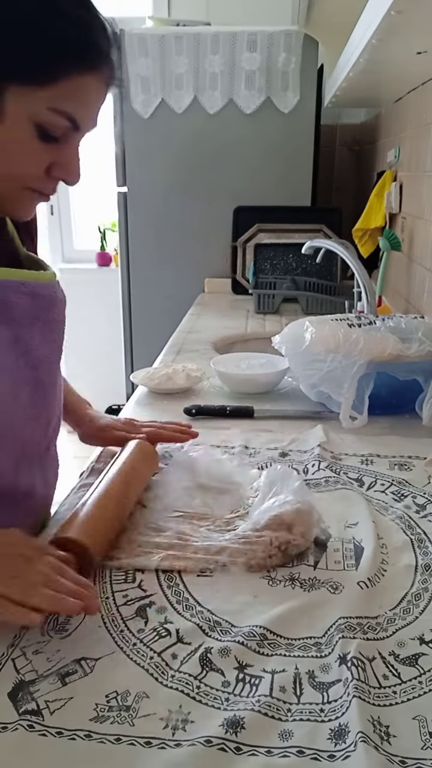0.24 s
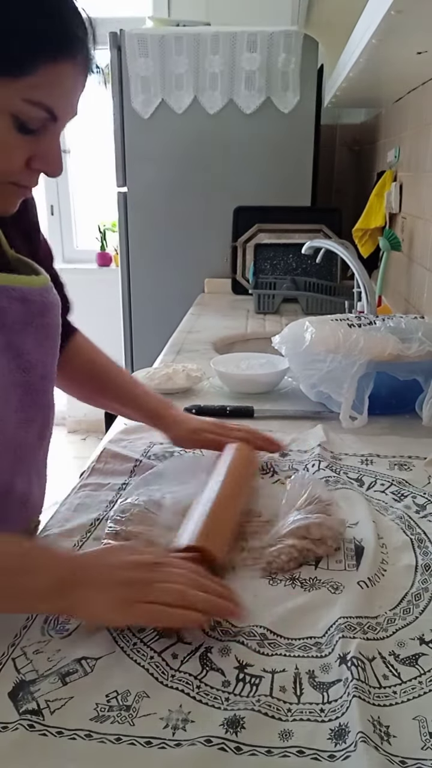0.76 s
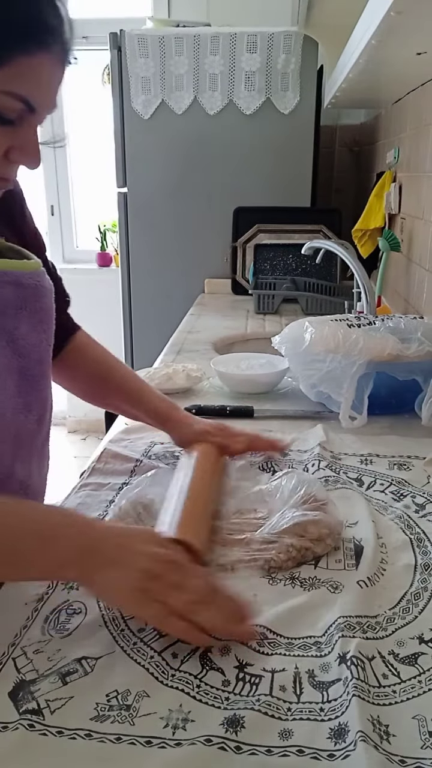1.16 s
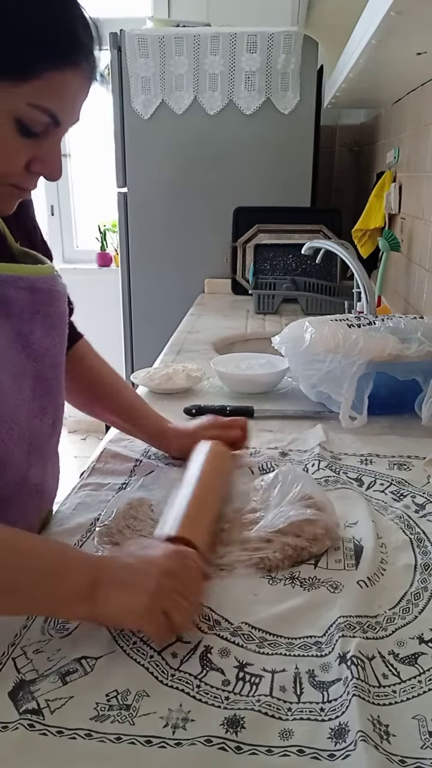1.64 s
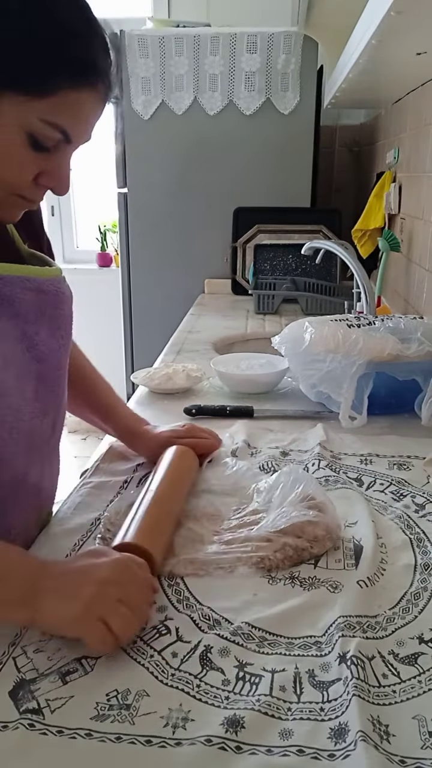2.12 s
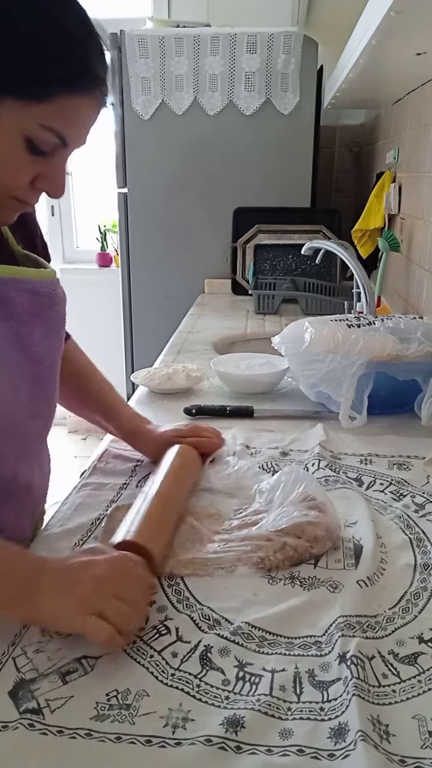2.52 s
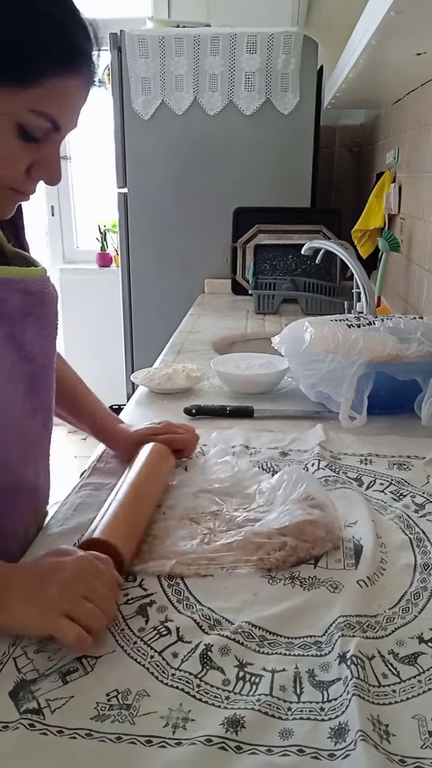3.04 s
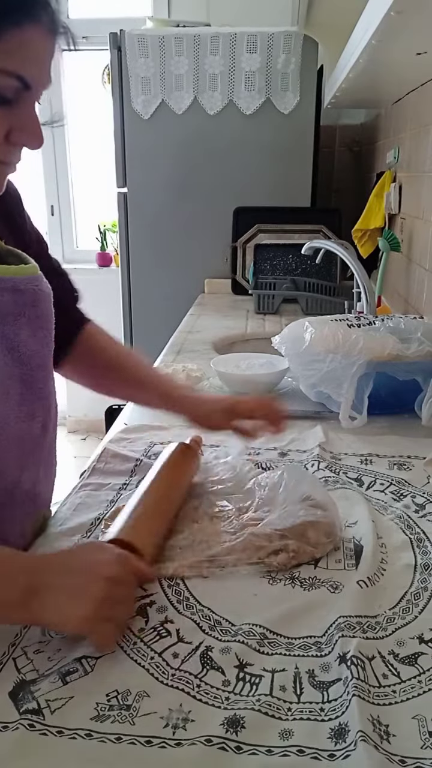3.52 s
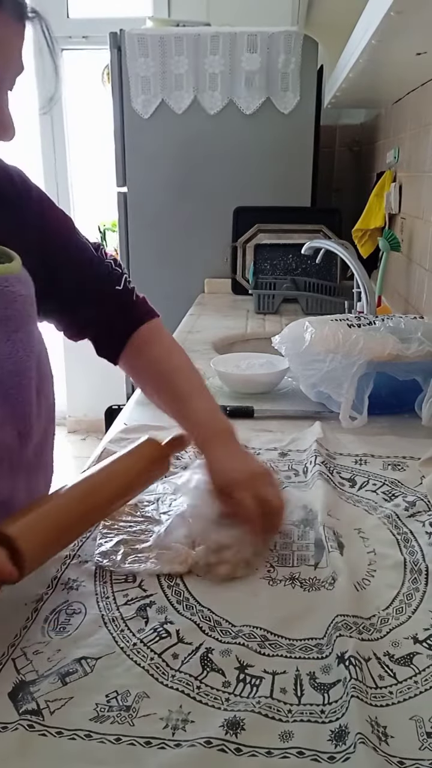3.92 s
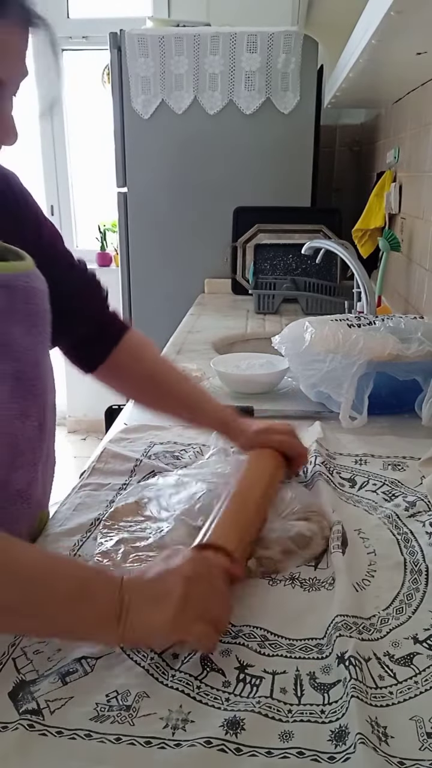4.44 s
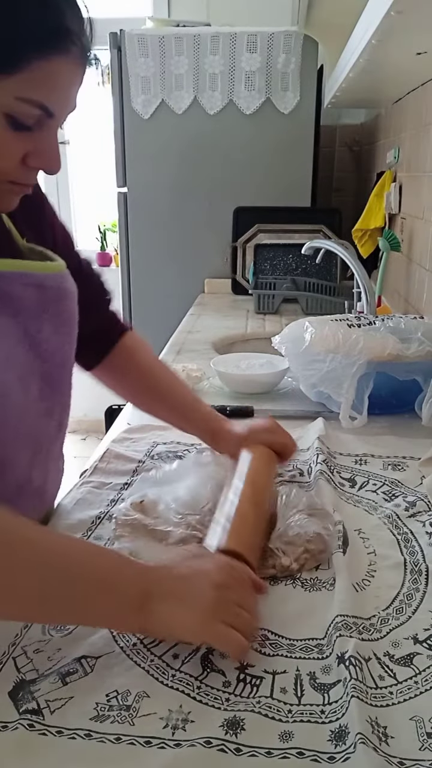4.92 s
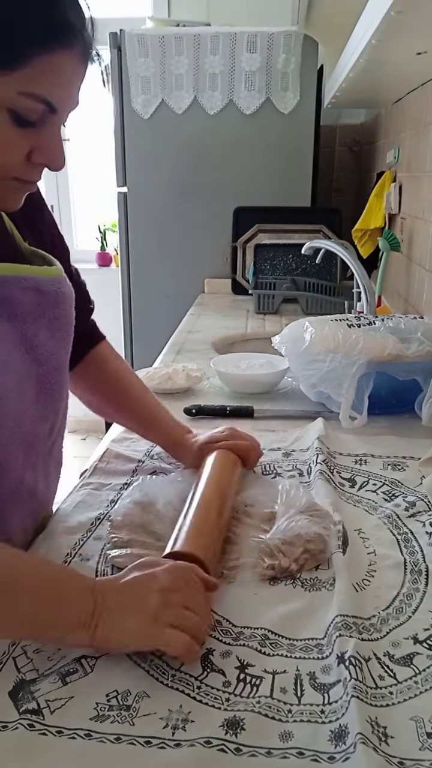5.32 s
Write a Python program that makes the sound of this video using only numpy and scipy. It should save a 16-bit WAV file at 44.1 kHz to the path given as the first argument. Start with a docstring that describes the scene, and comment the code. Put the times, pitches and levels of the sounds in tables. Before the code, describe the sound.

Close up in a small hard-walled kitchen, a wooden rolling pin crushes nuts in a crinkling plastic bag. Early strokes crackle, with one loud crack just before two seconds. Softer rolling follows with low counter rumble and tiny squeaks. The loose handle rattles as the pin lifts, a hand rustles the bag, then harder strokes bring a run of cracks and a strong wooden knock near the end. Small microphone, little deep bass.

```python
"""Crushing nuts with a rolling pin

Nuts in a plastic bag are crushed under a wooden pin on a cloth-covered counter in a hard-walled kitchen.
Cracks and light ticks are bursts of tiny clicks that ring the pin; knocks ring hollow wood and the counter.
The bag crinkles in random snaps, crumbs shake the counter, a loose handle rattles and the axle squeaks.
Filtered noise gives the echoes and the room's air; wavering sines make an appliance's hum."""
import sys
import numpy as np
from scipy import signal
from scipy.fft import rfft, irfft
from scipy.io import wavfile

SR = 44100
rng = np.random.default_rng(int(sys.argv[2]) if len(sys.argv) > 2 else 0)


def inscribe(sig):
    """Save sig as 16-bit PCM at rate SR to the path in sys.argv[1].

    A 1-D sig is mono; a 2-D sig holds one channel per row.
    Samples are clipped to [-1, 1] before scaling.
    """
    pcm = np.round(np.clip(np.atleast_2d(sig).T, -1, 1) * 32767)
    wavfile.write(sys.argv[1], SR, pcm.astype(np.int16))


def ratio_of_db(decibels):
    """Turn decibels (scalar or array-like) into linear amplitude factors; 0 dB maps to 1."""
    return 10 ** (np.asarray(decibels, float) / 20)


N = 245195   # length in samples
STILL_DB = -90   # level of the bag and the counter when nothing moves them


def rms_one(x):
    """Scales a sound to an rms of 1."""
    return x / np.sqrt(np.mean(x ** 2) + 1e-20)


def at_hz(points, hz):
    """Reads a curve of (f/Hz, value), with straight lines over log frequency."""
    points = np.array(points)
    return np.interp(np.log(hz + 1), np.log(points[:, 0]), points[:, 1])


def drift(rate_hz):
    """Slow chance: noise through two equal one-pole low-passes at rate_hz, rms 1."""
    r = np.exp(-80 * np.pi * rate_hz / SR)   # made at a fortieth of the sample rate
    noise = rng.standard_normal(N // 40 + 2002)
    slow = signal.lfilter([1], [1, -2 * r, r * r], noise)[2000:]
    return np.interp(np.arange(N) / 40, np.arange(len(slow)), rms_one(slow))


def colour(x, spectrum, size=8192):
    """A causal filter with this spectrum and unit energy, made by folding the cepstrum."""
    cepstrum = irfft(np.log(ratio_of_db(at_hz(spectrum, np.fft.rfftfreq(size, 1 / SR)))))
    cepstrum[1:size // 2] *= 2
    cepstrum[size // 2 + 1:] = 0
    shape = irfft(np.exp(rfft(cepstrum)))[:size // 2]
    return signal.fftconvolve(x, shape / np.sqrt(np.sum(shape ** 2)))[:len(x)]


def bandpass(x, low_hz, high_hz):
    """Keeps one band of frequencies."""
    return signal.sosfilt(signal.butter(2, [low_hz, high_hz], "band", fs=SR, output="sos"), x)


def ring(push, hz, t60):
    """A resonance: a unit click sets off a sine that falls by 60 dB in t60 seconds."""
    r, w = ratio_of_db(-60 / (t60 * SR)), 2 * np.pi * hz / SR
    return signal.lfilter([0, np.sin(w)], [1, -2 * r * np.cos(w), r * r], push + 1e-18)


def struck(push, modes, extra_db, neighbour=-1):
    """A push rings all the modes of a body, by default with neighbours in opposite phase; peak 1."""
    sound = 0
    for (hz, db, t60), more_db in zip(modes, extra_db):
        shifted_hz = hz * rng.normal(1, 0.002)   # grip and load shift each mode a little
        sound = ratio_of_db(db + more_db) * ring(push, shifted_hz, t60) + neighbour * sound
    return sound / np.max(np.abs(sound))


def near_mode(modes, ring_hz, boost_db):
    """The contact point favours the modes near ring_hz: extra dB for each mode."""
    octaves = np.log2(np.array(modes)[:, 0] / ring_hz)
    return boost_db * np.exp(-(octaves / 0.2) ** 2)


def grains(count, per_s, spread_db):
    """Random clicks of either sign, a few much larger than the rest."""
    sizes = ratio_of_db(spread_db * np.minimum(rng.exponential(1, count), 5)) * rng.choice([-1, 1], count)
    return sizes * (rng.random(count) < per_s / SR)


# Cracks of nuts, and a few light ticks, probably of the handle:
# t/s, peak of the snap level/dB, favoured ring f/Hz, peak of the pin's ring level/dB
CRACKS = [(0.102, -37.5, 1670, -33), (0.113, -39, 2430, -39), (0.3433, -57, 1870, -41),
          (0.433, -30.5, 1950, -30), (0.444, -27.5, 1780, -25), (0.453, -50, 2680, -34),
          (0.948, -26, 2700, -22), (0.958, -32.5, 1920, -32), (1.1977, -38, 2010, -33.5),
          (1.612, -58, 1900, -38.5), (1.8066, -58, 2600, -43.5), (1.9086, -15.5, 2220, -22),
          (1.914, -28, 1510, -27.5), (1.9102, -21.5, 2850, -15), (4.252, -42.5, 1480, -41.5),
          (4.2717, -40.5, 2780, -35.5), (4.408, -32.5, 1480, -38), (4.4191, -28.5, 2700, -22),
          (4.863, -22, 2800, -22), (5.002, -37, 1240, -35), (5.0092, -27.5, 2110, -16),
          (5.012, -46, 1230, -19.5), (5.1519, -31, 2800, -27.5), (5.277, -15.5, 1710, -12),
          (5.3987, -41, 2610, -31), (5.521, -39.5, 1210, -19), (5.52, -22, 2080, -15.5)]
# What pin and nuts ring with: f/Hz, relative level/dB, time to fall by 60 dB t/s
PIN_MODES = [(1244, -12, .035), (1460, -8, .035), (1680, -8, .035), (1870, -4, .018), (2060, -3, .016),
             (2190, -2, .016), (2420, -2, .013), (2680, 0, .01), (2950, -1, .009), (3300, -5, .009),
             (3800, -1, .008), (4350, -1, .009), (5700, -4, .01), (6350, -3, .01)]
# Colour of a snap: f/Hz, relative level/dB (per Hz)
SNAP_COLOUR = [(710, -27.5), (1200, -38), (1970, -20), (2190, -12), (3220, -21), (3870, -11), (4900, -22),
               (5870, -9.5), (11600, -82), (15600, -58)]


def cracks():
    """A crack or tick is a few ms of splinters, and the jolt rings the pin."""
    out, size = np.zeros(N + SR), SR // 2
    t, pin_hz = np.arange(size) / SR, np.array(PIN_MODES)[:, 0]
    swell = t / .005 * np.exp(1 - (t / 0.0063) ** 2)
    click = np.exp(-((t - .00012) / .00004) ** 2 / 2)
    for s, snap_db, ring_hz, ring_db in CRACKS:
        soft = np.clip(-.015 * (snap_db + 56.0), 0, .9)   # sets the filter that tilts the splinters
        splinters = signal.lfilter([1 - soft], [1, -soft], grains(size, 15000.0, 3.5) * swell)
        snap = colour(splinters, SNAP_COLOUR)
        sound = ratio_of_db(snap_db) * snap / np.max(np.abs(snap))
        # a light touch, then the full weight
        gap_s = rng.uniform(0.002177, 0.003518)
        bounce = 0.35 * click + np.roll(click, round(gap_s * SR))
        extra_db = near_mode(PIN_MODES, ring_hz, 9) - 6 * np.log2(pin_hz / 2000)
        extra_db = extra_db + rng.normal(0, 2, len(PIN_MODES))
        sound += ratio_of_db(ring_db) * struck(np.diff(bounce, prepend=0), PIN_MODES, extra_db)
        at = round((s - .001) * SR)
        out[at:at + size] += sound
    return out[:N]


# The pin drops onto the counter: t/s, wooden knock level/dB, counter thud level/dB,
# hardness level/dB (per octave; higher brings out the upper modes)
KNOCKS = [(0.106, -47.5, -46, -1), (0.347, -44.5, -56, -4), (0.439, -33.5, -47, 12), (0.456, -37.5, -63, 8),
          (0.956, -27.5, -34.5, 3), (1.199, -45.5, -62, 0), (1.383, -51, -51, 1), (1.908, -75, -26, -2),
          (2.234, -51.5, -53, -2.5), (2.601, -58.5, -66, 3), (2.696, -54, -70, 5), (2.748, -65, -43, -12),
          (2.789, -46.5, -40.5, -4), (2.959, -69, -48.5, -7), (3.134, -46.5, -50.5, -5.5),
          (3.681, -42, -43, -6.5), (4.411, -44, -47, 2.5), (4.423, -50, -39, -5), (5.008, -38, -28, 6.5),
          (5.275, -16, -20.5, 6), (5.518, -48, -23.5, 13)]
# Hollow wood: f/Hz, relative level/dB, time to fall by 60 dB t/s
WOOD_MODES = [(237, 7, 0.11), (303, 10.5, 0.04), (341.5, -1.5, 0.14), (468, 10.5, 0.026), (645, 7.5, 0.03),
              (787, 7, 0.017), (1092, 2, 0.014)]
# The counter, also shaken by the rumble: f/Hz, level/dB (before mixing), fall by 60 dB after a thud t/s
COUNTER_MODES = [(90.7, 7.5, 0.26), (108.4, 9, 0.3), (144.8, 10.5, 0.21)]


def knocks():
    """A quick tap rings the hollow wood, a slower jolt the counter."""
    jolt_early_s = .003   # start the slow jolt early so that its peak meets the tap
    out, size = np.zeros(N + SR), SR // 2
    t = np.arange(size) / SR
    tap, jolt = [np.exp(-((t - 3 * width_s) / width_s) ** 2 / 2) for width_s in (.00015, .001)]
    for s, knock_db, thud_db, hard_db in KNOCKS:
        at = round(s * SR)
        wood_db = hard_db * np.log2(np.array(WOOD_MODES)[:, 0] / 300)
        wood_db = wood_db + rng.normal(0, 2.5, len(WOOD_MODES))
        out[at:at + size] += ratio_of_db(knock_db) * struck(tap, WOOD_MODES, wood_db)
        at -= round(jolt_early_s * SR)
        slab_db = rng.normal(0, 1.9, len(COUNTER_MODES))
        # the slab sets off as one: modes add with the same sign
        out[at:at + size] += ratio_of_db(thud_db) * struck(jolt, COUNTER_MODES, slab_db, neighbour=0.76)
    return out[:N]


# Colour of the bag's snaps as the microphone hears them, before the bands flicker:
# f/Hz, relative level/dB (per Hz)
BAG_COLOUR = [(180, -33.5), (300, -3.5), (397, -17), (461, -15), (879, -16), (2010, -4.5), (2490, 2.5),
              (3190, -7.5), (4670, -11), (6710, -5), (8890, -16.5), (10700, -31.5), (13400, -32.5),
              (15600, -13)]


def crinkle(level_db, folding_db):
    """Thin plastic buckles in thousands of tiny clumped snaps; crumbs break under it."""
    snaps = colour(grains(N, 6700.0 * ratio_of_db(2.7 * drift(24)), 2.4), BAG_COLOUR)
    out, edges_hz = 0, [200, 600, 1250, 1800, 3600, 5200, 8000, 11000, 16000]
    for low, high in zip(edges_hz, edges_hz[1:]):
        # the finest hiss and the dull rustle come from slow folding, less from jerks
        muffled_db = 0.34 * (folding_db - level_db) * (low > 9000 or high < 1300)
        flicker_db = .5 * drift(48) + 2.36 * drift(1.67)
        # neighbours meet in opposite phase, so signs alternate
        out = bandpass(snaps, low, high) * ratio_of_db(flicker_db + muffled_db) - out
    # every crumb is dealt one of ten pitches
    pitches_hz, dealt = np.geomspace(1200, 4200, 10), rng.integers(0, 10, N)
    crumbs = grains(N, 400 * ratio_of_db(4 * drift(10)), 3.9)
    crunch = sum(ring(crumbs * (dealt == k), hz, 9 / hz) for k, hz in enumerate(pitches_hz))
    return ratio_of_db(level_db) * (rms_one(out) + ratio_of_db(-12.0) * rms_one(crunch))


# Pushes of the pin into the bag: most pressure t/s, build-up t/s, easing t/s,
# bag crinkle level/dB, counter rumble level/dB
STROKES = [(0.02, 0.25, .1, -53.5, -75), (0.118, 0.16, 0.15, -48.5, -45.5), (0.40, 0.15, 0.11, -47.5, -43),
           (0.449, 0.062, 0.067, -42.5, -39), (0.70, 0.85, 0.16, -58, -64), (0.87, 0.27, 0.11, -52.5, -63),
           (1.02, 0.065, 0.1, -56.5, -48), (1.21, 0.12, 0.096, -52, -53.5),
           (1.40, 0.053, 0.046, -58.5, -52.5), (1.48, 0.27, 0.12, -53.5, -56.5),
           (1.64, 0.34, 0.18, -62, -70.5), (2.02, 0.23, 0.16, -58, -47), (2.21, 0.11, 0.1, -53.5, -58),
           (2.41, 0.22, 0.16, -55, -58), (2.59, 0.12, 0.088, -56.5, -54), (2.811, 0.22, 0.088, -51, -52.5),
           (2.99, 0.2, 0.11, -56, -56), (3.16, 0.13, 0.17, -53.5, -55), (3.40, 0.27, 0.24, -60, -69.5),
           (4.435, 0.075, 0.02, -46, -48.5), (4.54, 0.27, 0.13, -55, -52.5),
           (4.725, 0.12, 0.085, -42.5, -51), (5.04, 0.067, 0.2, -58.5, -47.5), (5.33, 0.1, 0.2, -67, -40),
           (5.535, 0.047, 0.059, -46, -35)]


def pressure(column, lead_s):
    """Power of all strokes, for the bag (column 0) or counter (1): each builds up and eases off."""
    fade_db, roundness = 36.5, 2.02   # drop over build-up or easing; 1 is pointed, 2 rounded
    t, power = np.arange(N) / SR + lead_s, ratio_of_db(2 * STILL_DB)
    for s, rise_s, ease_s, *peak_db in STROKES:
        away = np.where(t < s, (s - t) / rise_s, (t - s) / ease_s)
        power = power + ratio_of_db(2 * (peak_db[column] - fade_db * away ** roundness))
    return power


# A hand gathers the nuts in the bag: t/s, crinkle level/dB
HAND = [(3.632, -90), (3.644, -68), (3.678, -47), (3.718, -49.5), (4.044, -55), (4.093, -100), (4.14, -82)]


def gathering():
    """Power of the crinkle under the hand, in straight dB lines between the points."""
    hand_db = np.interp(np.arange(N) / SR, *np.transpose(HAND), left=STILL_DB, right=STILL_DB)
    return ratio_of_db(2 * hand_db)


def aftermath(times, peak_db, t60):
    """Power that builds up steeply to a peak just after every event, then dies away."""
    build_s, after_s = .0012, .004
    jumps, r, strain = np.zeros(N), ratio_of_db(-120 / (t60 * SR)), np.exp(-1 / (build_s * SR))
    jumps[((times + after_s) * SR).astype(int)] = ratio_of_db(2 * peak_db)
    # filtering backwards in time gives the build-up
    before = signal.lfilter([0, strain], [1, -strain], jumps[::-1] + 1e-18)[::-1]
    return before + signal.lfilter([1], [1, -r], jumps + 1e-18)


def bag():
    """Strokes and the hand fold the bag, and every snap jerks it."""
    crack_s, snap_db, *_ = np.transpose(CRACKS)
    folding = pressure(0, 0) + gathering()
    jerks = aftermath(crack_s, snap_db - 6.5, t60=0.025)
    return crinkle(10 * np.log10(folding + jerks), 10 * np.log10(folding))


def rumble():
    """The pin bumps over crumbs and shudders after thuds, which keeps the counter's low modes shaking."""
    knock_s, _, thud_db, _ = np.transpose(KNOCKS)
    strokes = pressure(1, lead_s=0.0032)   # the counter feels the push before the bag folds
    level_db = 10 * np.log10(strokes + aftermath(knock_s, thud_db - 8, t60=0.1))
    bumps = grains(N, 200 * ratio_of_db(4 * drift(12)), 3.5)
    bumps = np.stack([bumps, bumps * ratio_of_db(level_db)])   # steady ones set the scale
    # under the pin the counter rings half as long
    shaken = sum(ratio_of_db(db) * ring(bumps, hz, 0.5 * t60) for hz, db, t60 in COUNTER_MODES)
    shaken += ratio_of_db(-16.0) * sum(ratio_of_db(db) * ring(bumps, hz, t60) for hz, db, t60 in WOOD_MODES[:4])
    return shaken[1] / np.std(shaken[0])


# The loose handle rattles as the pin is lifted: t/s, peak level/dB, favoured ring f/Hz
RATTLE = [(3.4463, -36, 2330), (3.5004, -33, 2090), (3.511, -41, 1900), (3.5165, -32.5, 2070),
          (3.524, -36, 1910), (3.5363, -41, 2200), (3.5548, -45, 1900)]
# What the handle rings with: f/Hz, relative level/dB, time to fall by 60 dB t/s
HANDLE_MODES = [(1500, -9, .008), (1860, 0, .016), (2050, -3, .01), (2220, 0, .012), (2450, -5, .009),
                (2720, -2, .014), (3950, -8, .014), (5100, -13, .008), (6400, -9, .008)]


def rattle():
    """Wood on wood: each touch is a short chatter into the handle's modes, those nearby favoured."""
    out, size = np.zeros(N), SR // 4
    fade = np.exp(-np.arange(size) / (0.0022 * SR))
    for s, peak_db, ring_hz in RATTLE:
        at = round(s * SR)
        chatter = fade * rng.standard_normal(size)
        push = signal.lfilter([1, 2, 1], [1, -.4], np.diff(chatter, prepend=0))
        extra_db = near_mode(HANDLE_MODES, ring_hz, 6) + rng.normal(0, 1, len(HANDLE_MODES))
        out[at:at + size] += ratio_of_db(peak_db) * struck(push, HANDLE_MODES, extra_db)
    return out


# Axle squeaks: middle t/s, peak level/dB, pitch f/Hz, length of the swell t/s
SQUEAKS = [(0.381, -44.5, 5250, 0.019), (1.516, -52, 1830, 0.014), (1.55, -58, 1840, 0.076),
           (2.421, -44.5, 5120, 0.0074), (2.597, -45, 3680, 0.0099), (2.63, -48.5, 3640, 0.0081),
           (3.106, -32, 5070, 0.0087)]


def squeaks():
    """Brief stick-slip at the axle: a pure note with a weak octave swells and dies, then the axle rings on."""
    tail_db, tail_t60_s = -11, .25   # each short squeak leaves the axle ringing on with its note, fading away
    t, out = np.arange(N) / SR, 0
    for s, peak_db, hz, length_s in SQUEAKS:
        phase = 2 * np.pi * hz * (t - s)
        swell = np.exp(-(2 * (t - s) / length_s) ** 2)
        echo = (t > s) * ratio_of_db(tail_db - 60 * np.abs(t - s) / tail_t60_s)
        note = np.sin(phase) + ratio_of_db(-36.0) * np.sin(2 * phase)
        out = out + ratio_of_db(peak_db) * np.maximum(swell, echo) * note
    return out


# How long the kitchen echoes: f/Hz, time to fall by 60 dB t/s
KITCHEN = [(300, 0.34), (600, 0.45), (1500, 0.44), (4000, 0.32), (10000, 0.34)]


def kitchen(x):
    """Dense reflections off tiles and cupboards, dying band by band; unit energy."""
    far_s, far_db, far_spread_s = 0.0352, 2, 0.0065   # a cluster of echoes from across the room
    t, tail, edges_hz = np.arange(SR // 2) / SR, 0, 240 * 2 ** np.arange(7)
    for low, high in zip(edges_hz, edges_hz[1:]):
        band = bandpass(rng.standard_normal(len(t)), low, high)
        tail = tail + band * ratio_of_db(-60 * t / at_hz(KITCHEN, np.sqrt(low * high)))
    tail = tail * np.clip((t - .004) / 0.0053, 0, 1)   # the first walls answer after a few ms
    tail = tail * ratio_of_db(far_db * np.exp(-((t - far_s) / far_spread_s) ** 2))
    return signal.fftconvolve(x, tail / np.sqrt(np.sum(tail ** 2)))[:N]


# Colour of the room's air: f/Hz, relative level/dB (per Hz)
AIR_COLOUR = [(35, -23), (60, -10), (260, 1.5), (395, -0.5), (1100, -10), (3690, 2), (4050, -8), (5870, -9),
              (15600, -38)]
# Hum of an appliance: f/Hz, level/dB (rms, before it wavers)
HUM = [(99, -80), (392, -82.5), (646, -94.5)]


def room_tone():
    """Soft steady air as filtered noise, and an appliance's hum as slightly wavering sines."""
    t, hum = np.arange(N) / SR, 0
    for hz, db in HUM:
        hum = hum + ratio_of_db(db + 1.0 * drift(3.5)) * np.sqrt(2) * np.sin(2 * np.pi * hz * t)
    return ratio_of_db(-73.5) * rms_one(colour(rng.standard_normal(N), AIR_COLOUR)) + hum


def scene():
    """Everything on the counter, near and through the room."""
    near = bag() + cracks() + knocks() + rattle()
    axle = squeaks()
    # the squeak's fading tail is mostly drawn in squeaks(); the shared room adds a little
    echoes = kitchen(near + ratio_of_db(-9) * axle)
    return (near + axle + ratio_of_db(-4.5) * echoes + rumble() + room_tone())[None]


def roll_off(x):
    """The treble ends steeply here."""
    return signal.sosfilt(signal.butter(12, 16440, fs=SR, output="sos"), x)


def record(dry):
    """A small microphone without deep bass; the top is cut."""
    x = signal.sosfilt(signal.butter(4, 76.0, "high", fs=SR, output="sos"), dry)
    x = signal.sosfilt(signal.cheby2(12, 50, 15700, fs=SR, output="sos"), x)
    return roll_off(x)


dry = scene()
out = record(dry)
inscribe(out)
```